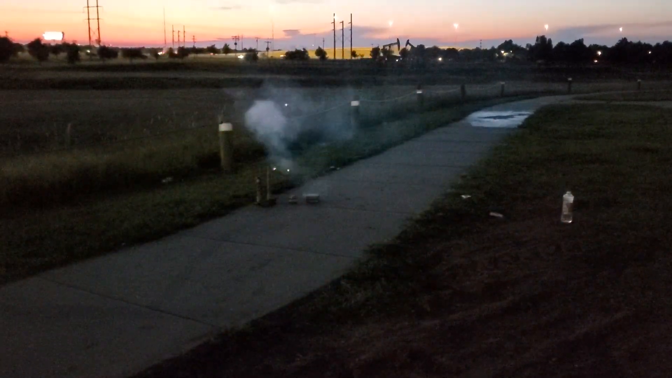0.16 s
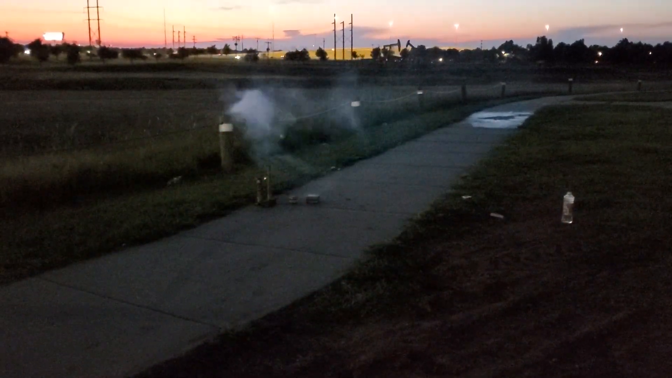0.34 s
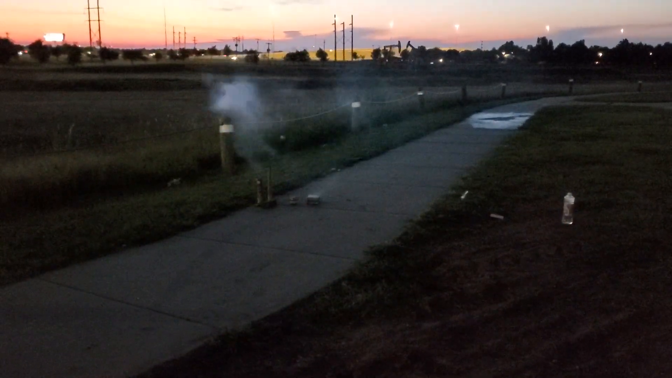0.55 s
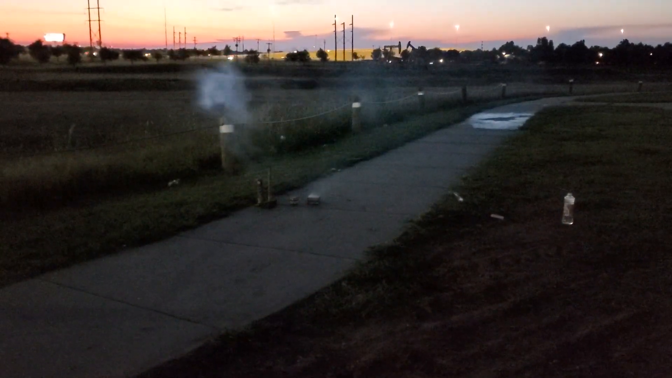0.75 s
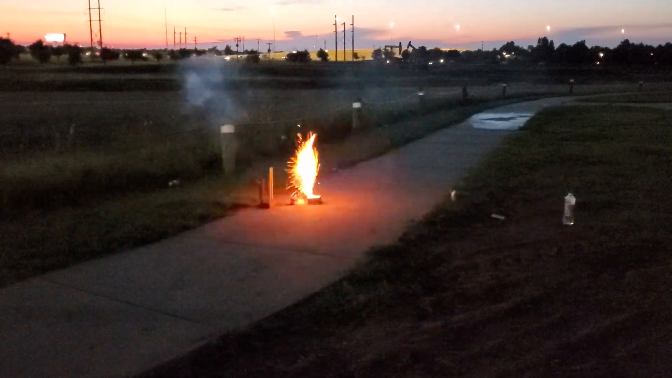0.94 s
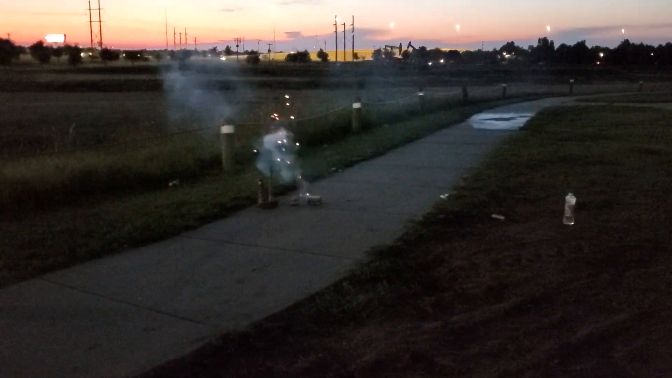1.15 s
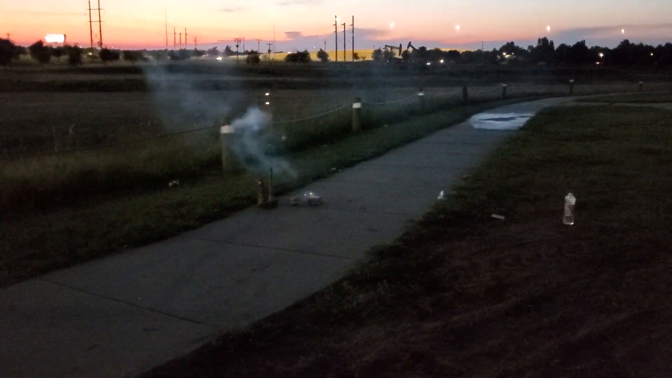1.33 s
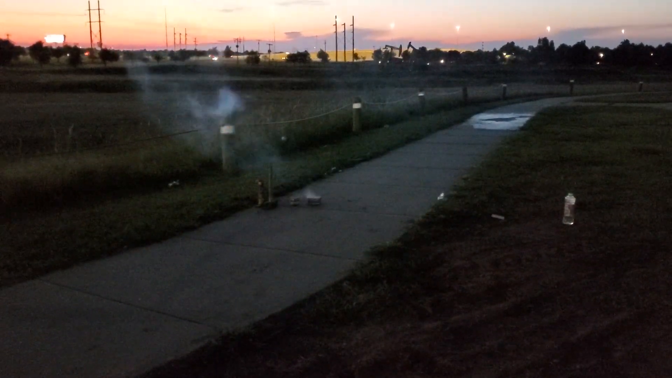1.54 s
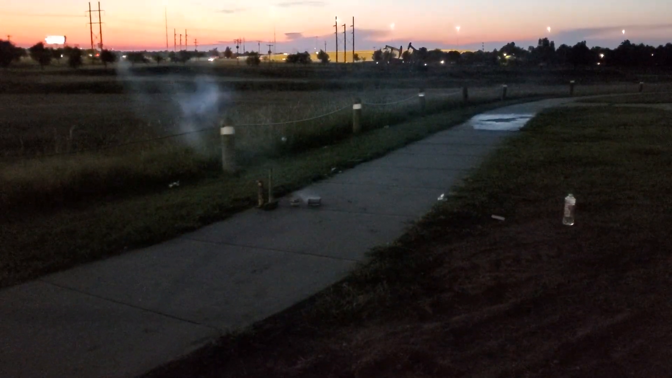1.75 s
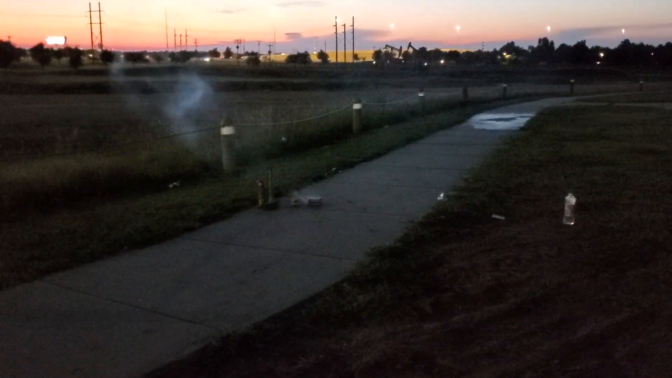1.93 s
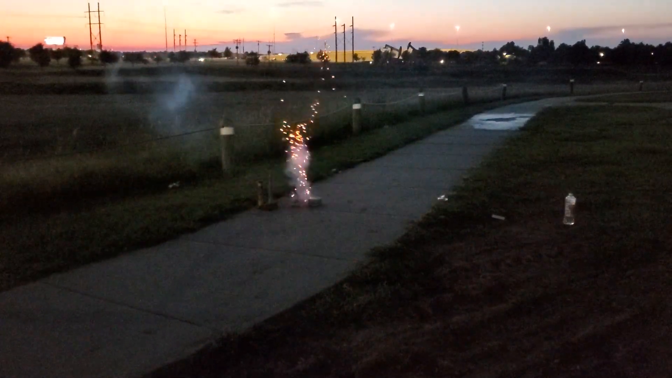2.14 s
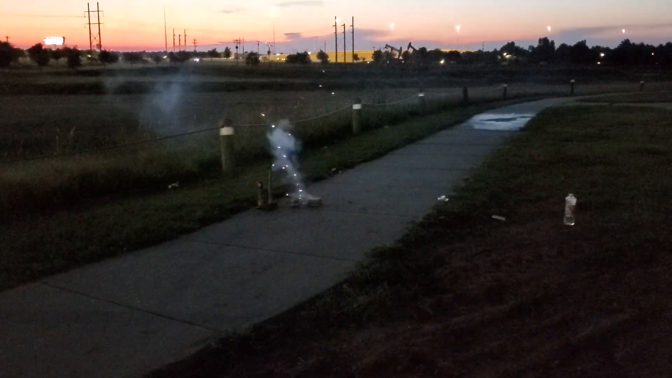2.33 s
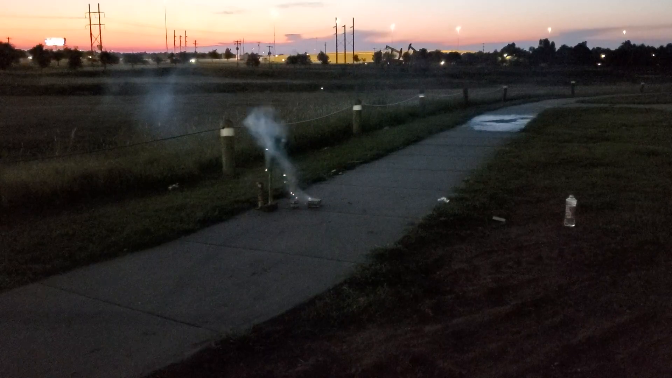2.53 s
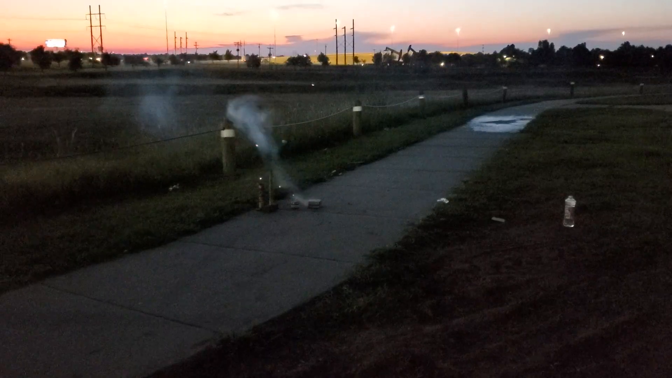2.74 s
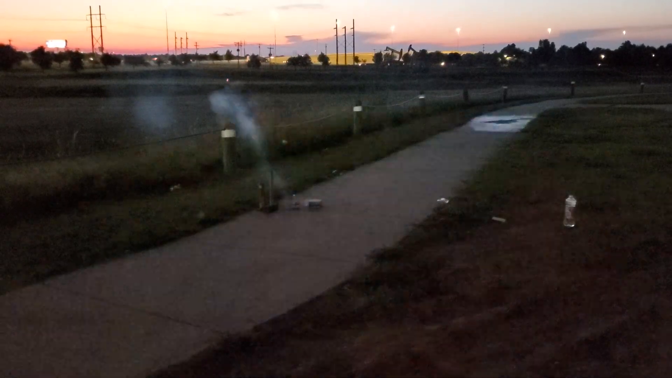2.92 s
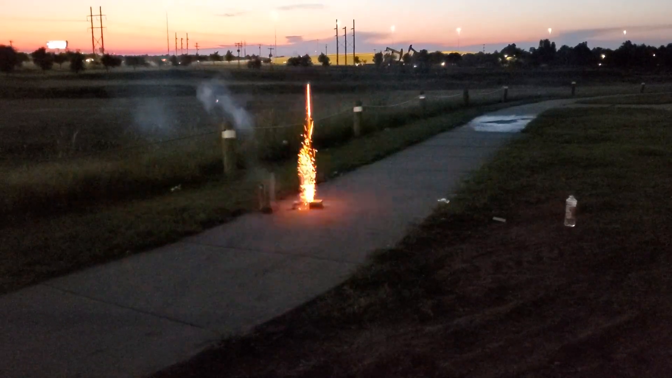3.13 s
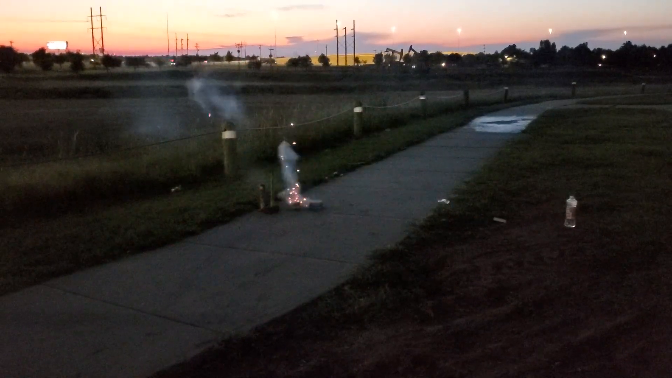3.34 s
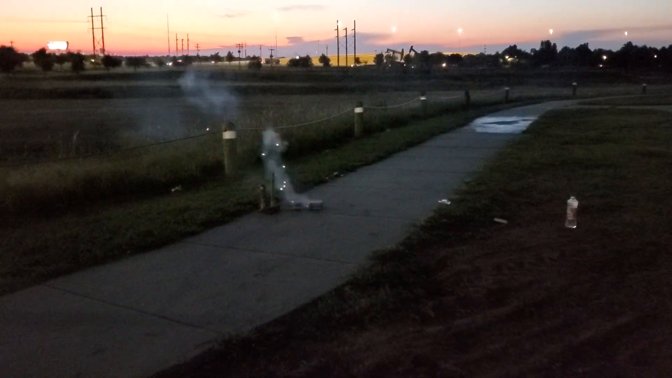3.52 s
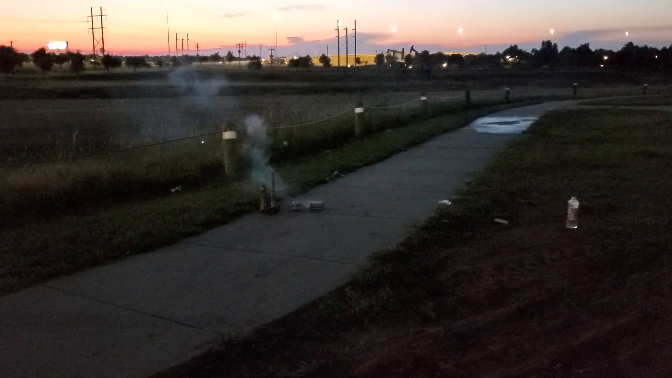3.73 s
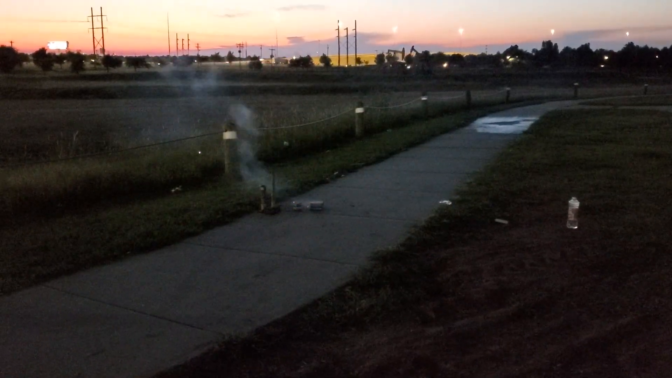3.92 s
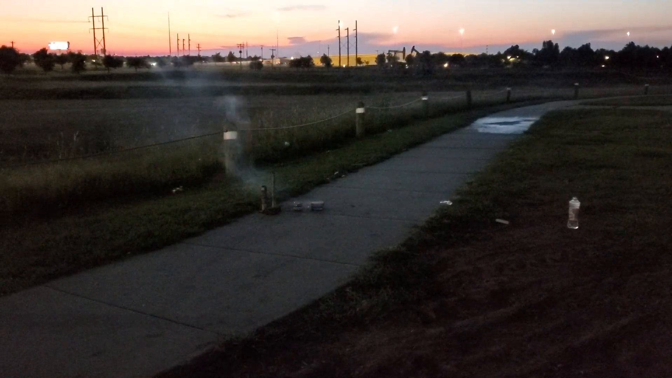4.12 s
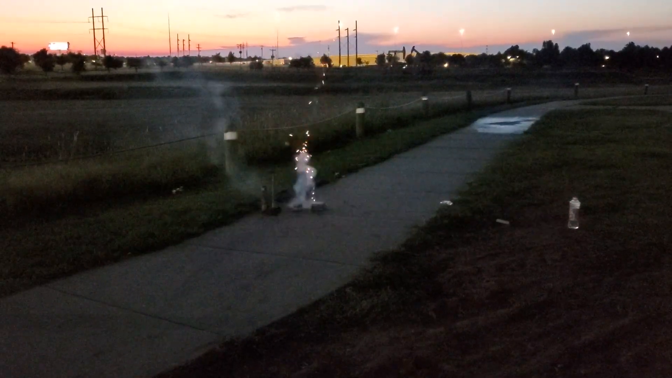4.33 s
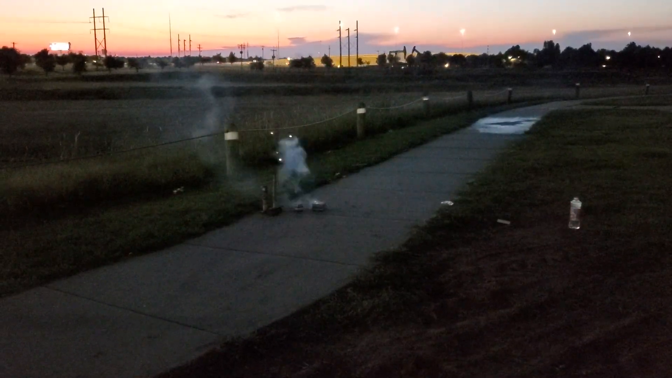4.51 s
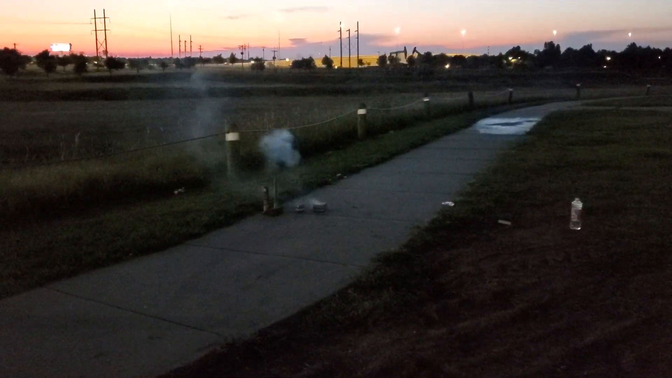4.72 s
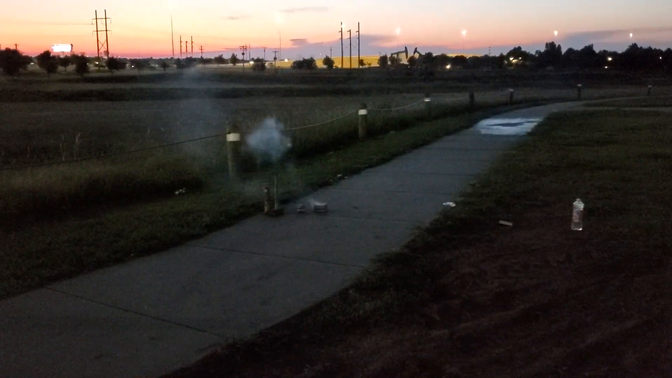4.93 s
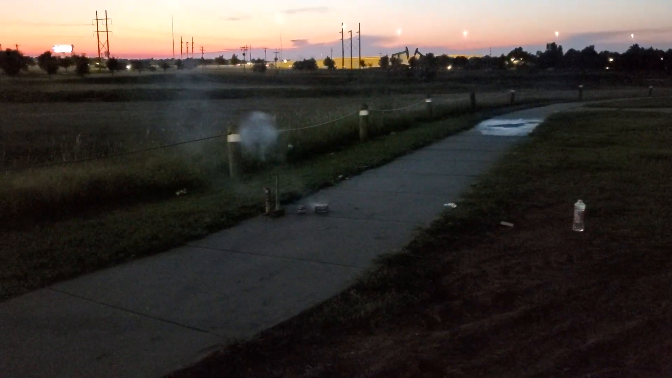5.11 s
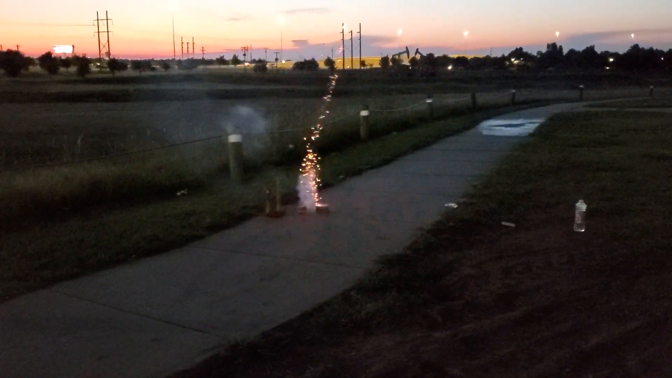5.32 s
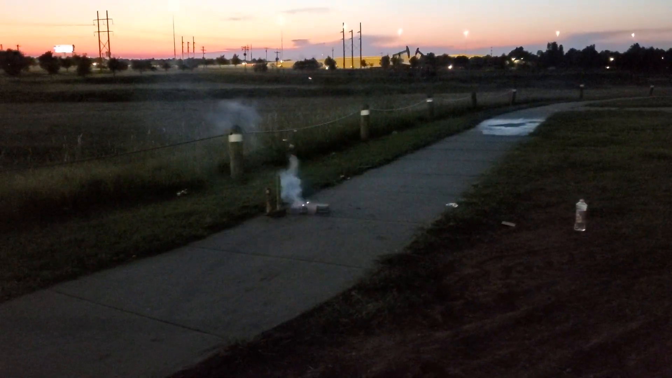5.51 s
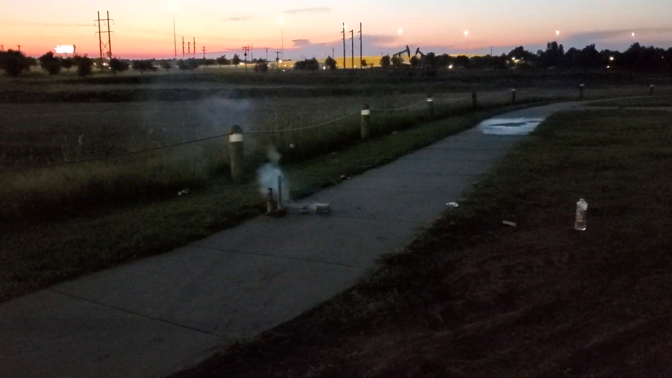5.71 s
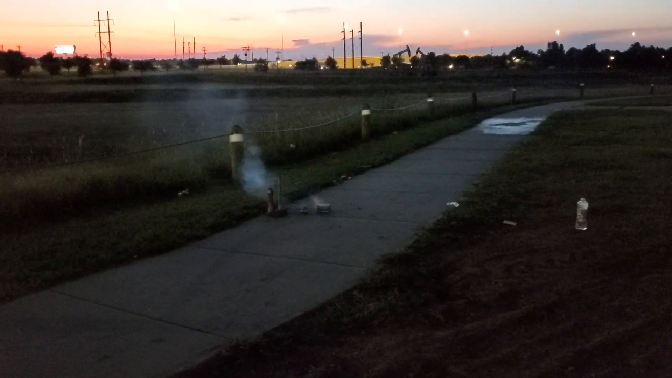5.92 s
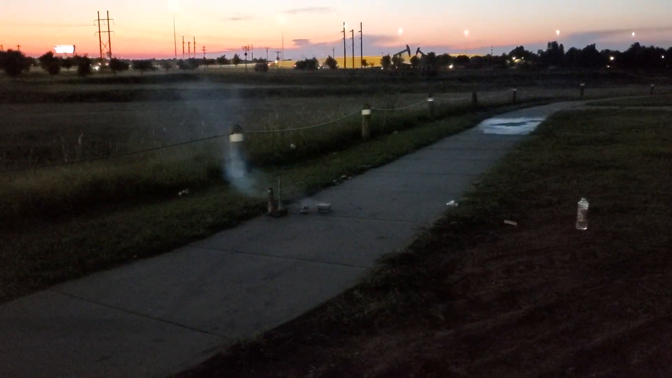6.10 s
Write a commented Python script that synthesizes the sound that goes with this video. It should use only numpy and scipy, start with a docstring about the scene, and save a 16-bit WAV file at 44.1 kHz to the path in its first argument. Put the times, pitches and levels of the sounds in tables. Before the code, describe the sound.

It opens at the tail of one whistle and a sharp crack. Five more small rockets follow at roughly one-second intervals, each with a cardboard pop, hissing shriek falling in pitch and, before the next launch, a loud crack with crackling scatter; the last bursts near the end. Deep thuds rumble between them. Outdoors on grass and concrete, close stereo phone microphone, faint field echo, quiet wind.

```python
"""Rocket battery in an open field

A small battery a few metres from a phone fires about once a second. Each rocket pops out of its tube
(damped modes and gas noise) and climbs with a falling whistle (uneven puffs: tone, overtones, hissing jet)
that beats against its ground reflection. Bursts crack overhead (pulse and decaying noise); short snaps and
knocks are decaying noise. Low thuds, mostly of far-off shells, are blunt pulses with a rumble; the field
echoes faintly (noise convolution), over a low, breezy background."""
import sys
import numpy as np
from scipy import signal
from scipy.fft import rfft, irfft
from scipy.io import wavfile
from scipy.ndimage import uniform_filter1d, map_coordinates

SR = 44100
rng = np.random.default_rng(int(sys.argv[2]) if len(sys.argv) > 2 else 0)


def to_wav(s):
    """Save 16-bit WAV."""
    ch = np.atleast_2d(s).T  # columns
    pcm = np.round(np.clip(ch, -1, 1) * 32767)  # PCM
    wavfile.write(sys.argv[1], SR, pcm.astype(np.int16))


N = 271656

# Rockets: [start t/s, burn time t/s, tube pop peak level/dB, squeal rise above pitch f/Hz, squeal length t/s,
# squeal boost level/dB, early dip of pitch f/Hz, pitch f/Hz, sag/(Hz/s), tone level/dB, level hold t/s,
# fade/(dB/s), rasp level relative to tone/dB, rasp drift/(dB/s)]
ROCKETS = [(-.15, 0.36, -11, 413.5, .015, 14, 1, 3100, 1358, -22, 0.25, 168, -2, -31),
           (1.001, .37, -12, 526, .017, 6, 201.5, 3000, 1493, -14.5, 0.17, 93, -7, -27),
           (2.093, 0.25, -18.5, 169, 0.01625, -8, -110, 2792, 400, -14.5, 0.1, 189, -4.5, -66),
           (3.164, 0.423, -11.5, 270, 0.011, 12.5, 2.5, 2956, 1733, -16, 0.15, 120, -6.5, -37),
           (4.241, 0.48, -8.5, 504, .015, 10.5, 230.5, 3004, 2036, -14.5, 0.16, 92, -9, -3.5),
           (5.3, 0.4, -10, 560, .016, 10, 0, 2935, 1750, -15, 0.16, 97, -6.5, -12)]
# Jumps of the whistle to a new pitch, which then sags: [t/s, pitch f/Hz, sag/(Hz/s), rasp surge level/dB]
JUMPS = [(1.189, 3128, 12540, 9.5), (1.23, 2990, 2664, 5), (2.214, 3000, 1710, 0), (3.343, 3026, 1983, 7),
         (4.531, 2832, 854, 1), (5.574, 2876, 740, -1.5)]
# Overtones; half multiples come from alternating strong and weak puffs: [multiple of pitch, relative level/dB]
OVERTONES = [(1.5, -8.5), (2, 5), (2.5, -21), (3, 4), (3.5, -12.5), (4, 4), (4.5, -20), (5, 10.5)]
# Spectrum of the jet hiss: [f/Hz, relative level/dB]
JET_SPECTRUM = [(400, -54), (2400, 5), (3700, -10), (5200, -8), (7200, 16.5), (9500, -1), (12000, 7),
                (16000, 0.5)]
# Bursts overhead: [t/s, level/dB, lag of ground reflection t/ms, relative level of reflection/dB]
BURSTS = [(.0301, 1, 8.1, -7.5), (0.93, 5.5, 8.4, -8), (2.0832, 2.5, 9.2, -6.5), (3.0612, 7, 7.8, -2),
          (4.4344, 6.5, 9.1, -6), (5.4831, 3.5, 8.1, -0.5)]
# Spectrum of the burst crack: [f/Hz, relative level/dB]
CRACK_SPECTRUM = [(100, -12.5), (400, -8), (800, -8), (1300, -2.5), (2400, -2.5), (3100, -6.5), (3900, -7),
                  (5000, -19), (8500, -22.5), (11500, -48.5), (15000, -12.5)]
# Modes of the cardboard tube: [f/Hz, relative level/dB, 60 dB decay t/s]
TUBE_MODES = [(518, -25.5, 0.11), (1180, 11.5, 0.017), (1900, 5.5, 0.02), (3180, 7, 0.011)]
# Short snaps and knocks: sparks, a tube knock (2.115), a fizz before a burst (3.05): [t/s, peak level/dB]
SNAPS = [(.214, -29), (2.072, -8), (2.115, -8), (2.299, -16.5), (3.05, -16), (3.094, -8.5), (3.312, -16.5),
         (4.715, -24.5), (5.585, -17)]
# Spectrum of snaps, gas and burst scatter: [f/Hz, relative level/dB]
SNAP_SPECTRUM = [(200, 1), (900, -3.5), (2300, 8.5), (4000, -2), (7500, -2.5), (11000, -22.5),
                 (16000, -1.5)]
# The two microphone ports, heard from the battery: [f/Hz, left minus right level/dB, phase lead of left/rad]
PORTS = [(96.4, -12, 0.77), (1125, 4, 1.01), (3290, -5.5, 0.96), (4400, -7.5, 4.13), (6260, 0.5, 8.9),
         (8600, 5.5, 11.2), (12320, 5.5, 11.5), (14300, 5.5, 21.8)]
# Spectrum of the echo from grass and tree lines: [f/Hz, relative level/dB]
FIELD_SPECTRUM = [(400, 4), (1000, -7), (3000, -7), (6000, -6.5), (9000, -14.5), (12000, -38.5),
                  (16000, -58)]
# Low thuds: far-off shells, the rumbling echo of a near burst (4.441), a spent casing landing (5.801, 5.827):
# [t/s, level/dB, upper edge of spectrum f/Hz]
THUDS = [(0.173, -24.5, 140), (0.917, -15, 164), (1.2926, 3.5, 670), (1.508, 2, 440), (1.622, -22, 288),
         (2.1764, -1.5, 302), (2.288, -12, 277), (4.441, -7.5, 404), (4.787, -24.5, 169), (5.801, -25, 465),
         (5.827, -21, 470), (5.899, -26.5, 145)]
# Spectrum of the rolling rumble: [f/Hz, relative level/dB]
RUMBLE_SPECTRUM = [(40, -30), (90, 7.5), (250, 4), (450, -5.5), (800, -14.5), (2000, -13.5), (6000, -30),
                   (10000, -63.5)]
# Spectrum of distant town and light wind: [f/Hz, relative level/dB]
TOWN_SPECTRUM = [(15, -50.5), (25, -13), (64, 8), (242, -17.5), (363, -20.5), (405, -22), (818, -19.5),
                 (1480, -26), (1890, -23.5), (2840, -23.5), (5880, -47.5), (16000, -55)]
# Breeze on the microphone, a gain on the deepest background: [t/s, level/dB]
BREEZE = [(0, 0), (2.5, 3.5), (3.2, -8.5), (5.2, -3), (6.1, -7.5)]

T = np.arange(N) / SR  # time/s
POP_LEAD_S = 0.011  # the tube pops this long before the whistle starts
STEADY_S, KNEE_S = 0.074, 0.014  # the pitch holds, then bends into its sag as the fuel burns down
DIP_S = .03  # decay constant of the pitch dip
# pause before the new sag, decay constant of the rasp surge, time a jump takes
JUMP_STEADY_S, SURGE_S, GLIDE_S = 0.0081, .045, 0.0023
SLIP_RAD = .5  # spread of the slip between strong and weak puffs
# sparks thrown by a burst: least delay, mean gap, level relative to the burst, fall with delay
EMBER_DELAY_S, EMBER_GAP_S, EMBER_DB, EMBER_DB_PER_S = .02, .025, -22.5, -63
TOWN_DB = -40  # rms level of the part common to both channels, before the breeze
TOP_HZ = 16000  # upper limit of the phone


def undb(db):
    """Logarithmic law: amplitude gain from decibels."""
    return 10 ** (np.asarray(db) / 20)


def unit(x):
    """Power normalisation: scale to rms 1."""
    return x / np.sqrt(np.mean(x ** 2))


def peak(x, db):
    """Amplitude normalisation: scale to a peak level."""
    return x * undb(db) / np.abs(x).max()


def fade(t, t60):
    """Exponential damping: 60 dB of decay in t60."""
    return np.exp(-np.log(1000) * t / t60)


def along(points, size):
    """Log-frequency interpolation: columns beside the first, f/Hz, at the bins of a transform of this size."""
    hz, *columns = np.transpose(points)
    bins = np.log(np.maximum(np.fft.rfftfreq(size, 1 / SR), 1))
    return [np.interp(bins, np.log(hz), column) for column in columns]


def noise(points, size):
    """Spectral shaping: white noise weighted by a spectrum, at rms 1."""
    gain = undb(along(points, size)[0])
    return unit(irfft(rfft(rng.standard_normal(size)) * gain, size))


def wide(points, size, side):
    """Sum and difference stereo: independent shaped noises, the difference scaled by side."""
    return noise(points, size) + side * np.array([[1], [-1]]) * noise(points, size)


def impulse(points, size=1024):
    """Minimum phase: a folded cepstrum gives the most compact causal pulse with this spectrum."""
    cepstrum = irfft(np.log(undb(along(points, size)[0])))
    cepstrum[1:size // 2] *= 2
    cepstrum[size // 2 + 1:] = 0
    return irfft(np.exp(rfft(cepstrum)))


def walk(rate, size):
    """Random modulation: a smooth curve through normal values of spread 1, rate of them a second."""
    steps = np.arange(size) * rate / SR
    return map_coordinates(rng.standard_normal(size), [steps], order=2, mode="nearest")


def add(track, s, x):
    """Superposition: mix x into the track from time s, dropping what lies outside."""
    start = int(s * SR)
    x = x[..., max(-start, 0):max(N - start, 0)]
    start = max(start, 0)
    track[..., start:start + x.shape[-1]] += x


def whistles(delay_s=0):
    """Superposition of sources: all the rockets in turn."""
    out = np.zeros((2, N))
    for start, burn_s, _, *voice in ROCKETS:
        whistle = rocket(*flight(start, burn_s, *voice))
        add(out, start + delay_s, climb(whistle))
    return out


def flight(start, burn_s, squeal_hz, squeal_s, squeal_db, dip_hz, hz, sag, db, hold_s, fade_db_per_s,
           rasp_db, drift_db_per_s, burnout_s=.04):
    """Burning and receding source: age, pitch, level and rasp from ignition squeal through sag to burn-out."""
    age = T[:SR // 2]
    pitch_hz = sagging(age, hz, sag, STEADY_S) - dip_hz * np.exp(-age / DIP_S)
    rasp = rasp_db + drift_db_per_s * age
    for s, jump_hz, jump_sag, surge_db in JUMPS:
        if 0 < s - start < age[-1]:
            since = np.maximum(age - (s - start), 0)
            pitch_hz = np.where(since > 0, sagging(since, jump_hz, jump_sag, JUMP_STEADY_S), pitch_hz)
            rasp = rasp + (since > 0) * surge_db * np.exp(-since / SURGE_S)
    squeal = np.exp(-(age / squeal_s) ** 4)
    pitch_hz = uniform_filter1d(pitch_hz, int(GLIDE_S * SR)) + squeal_hz * squeal
    # the boost is greatest shortly before the squeal breaks
    boost_db = squeal_db * np.exp(-((age / squeal_s - .68) / 0.32) ** 2)
    spent_db = 20 * np.maximum(age - burn_s + burnout_s, 0) / burnout_s  # 20 dB down at the burn time
    distance_db = fade_db_per_s * np.maximum(age - hold_s, 0)
    level_db = db + boost_db - distance_db - spent_db
    return age, pitch_hz, level_db, rasp - boost_db  # so the boost acts on the tone alone


def sagging(age, hz, hz_per_s, steady_s):
    """Pitch glide: a brief hold that bends smoothly into a steady fall."""
    return hz - hz_per_s * KNEE_S * np.logaddexp(0, (age - steady_s) / KNEE_S)


def wildness(pitch_hz, age, settle=0.02):
    """Unstable combustion: the flame is wild after ignition and at fast pitch changes; 0 settled, 2 at most."""
    slew = np.abs(np.gradient(pitch_hz)) * SR  # Hz/s
    return np.exp(-age / settle) + np.clip(uniform_filter1d(slew, size=700) / 25000, 0, 1)


def rocket(age, pitch_hz, level_db, rasp_db, attack_s=0.0042, jitter=0.0067, wild=2.8, flutter_rad=0.068,
           jet_db=-5.0, sputter_db=2.5, air_hz=9190.0, air_db_per_s=-32):
    """Pulsed burning: steep, uneven puffs ring the rocket's tube, and the jet hisses with each."""
    size = len(age)
    unrest = 1 + wild * wildness(pitch_hz, age)
    phase = 2 * np.pi * np.cumsum(pitch_hz * (1 + jitter * unrest * walk(350, size))) / SR
    ragged = phase + flutter_rad * walk(1300, size)
    slip = SLIP_RAD * walk(900, size)  # the strong-weak pattern keeps slipping, which blurs the half multiples
    overtones = np.zeros(size)
    for k, db in OVERTONES:
        half = 2 * k % 2  # 1 for a half multiple, else 0
        overtones += undb(db + sputter_db * walk(300, size)) * np.sin(k * ragged + half * slip)
    puffing = 1 + 0.055 * np.cos(phase)
    jet = unit(noise(JET_SPECTRUM, size) * puffing * undb(2.2 * walk(414, size)))
    rasp = undb(rasp_db) * (unit(overtones) + undb(jet_db) * jet)
    # the top of the rasp thins out as the rocket draws away
    dull = signal.sosfiltfilt(signal.butter(2, air_hz, fs=SR, output="sos"), rasp)
    rasp = dull + (rasp - dull) * undb(air_db_per_s * age)
    gate = np.clip(age / attack_s, 0, 1) * np.clip((age[-1] - age) / .015, 0, 1)
    return gate * undb(level_db) * (unit(np.sin(phase)) + rasp)


def ground_lag(age, speed=13., thrust=90.1, distance=5.4, mic_height=1.2):
    """Image source: delay/s of the ground reflection; speed/(m/s), thrust/(m/s^2), distance/m, mic_height/m."""
    height = speed * age + thrust * age ** 2 / 2
    extra = np.hypot(distance, height + mic_height) - np.hypot(distance, height - mic_height)
    return extra / 343  # speed of sound, m/s


def climb(x, ground=0.46, lift_off=0.0028, veer_ms=0.008, waver_db=1.0):
    """Interference: direct sound and a ground reflection of growing lag make the whistle throb at each port."""
    age = np.arange(len(x)) / SR
    bounce = ground * (1 - np.exp(-age / lift_off))
    pair = []
    for _ in range(2):
        # the rocket veers, so the path to each port wanders a little
        heard = age + veer_ms / 1000 * walk(27.5, len(x))
        direct = map_coordinates(x, [heard * SR])
        reflection = map_coordinates(x, [(heard - ground_lag(age)) * SR])
        pair.append((direct + bounce * reflection) * undb(waver_db * walk(89.8, len(x))))
    return np.array(pair)


def bursts(front_db=1, shred_db=-15, shred_t60=0.004, scatter_db=-29, scatter_t60=0.26, crackle_db=4):
    """Shock radiation: a front and tearing casing, again off the ground, with crackle and scatter from grass."""
    out, t = np.zeros(N), T[:SR // 3]
    for s, db, lag_ms, ground_db in BURSTS:
        crack = undb(shred_db) * noise(CRACK_SPECTRUM, len(t)) * fade(t, shred_t60)
        front = peak(impulse(CRACK_SPECTRUM), front_db)
        crack[:len(front)] += front
        crackle = unit(noise(SNAP_SPECTRUM, len(t)) * undb(crackle_db * walk(677, len(t))))
        scatter = crackle * fade(t, scatter_t60)
        add(out, s, undb(db) * (crack + undb(scatter_db) * scatter))
        add(out, s + lag_ms / 1000, undb(db + ground_db) * crack)
    return out


def launches(gas_db=-7, gas_t60=0.14):
    """Modal ringing: ignition knocks the cardboard tube and lets out a spit of gas."""
    out, t = np.zeros(N), T[:SR // 8]
    for start, _, db, *_ in ROCKETS:
        ring = sum(undb(mode_db) * np.sin(2 * np.pi * hz * t) * fade(t, t60) for hz, mode_db, t60 in TUBE_MODES)
        gas = undb(gas_db) * noise(SNAP_SPECTRUM, len(t)) * fade(t, gas_t60)
        add(out, start - POP_LEAD_S, peak(ring + gas, db))
    return out


def snaps(snap_t60=0.013, fizz_db=-14, fizz_t60=0.18):
    """Two-rate decay: sparks and other short knocks as noise that snaps and then fizzes out."""
    out, t = np.zeros(N), T[:SR // 10]
    for s, db in SNAPS + embers():
        envelope = fade(t, snap_t60) + undb(fizz_db) * fade(t, fizz_t60)
        add(out, s, peak(noise(SNAP_SPECTRUM, len(t)) * envelope, db))
    return out


def embers(count=3):
    """Random arrivals: sparks thrown by each burst, weaker the later they snap; rows of t/s, peak level/dB."""
    rows = []
    for s, db, *_ in BURSTS:
        for late in EMBER_DELAY_S + EMBER_GAP_S * np.cumsum(2 * rng.random(count)):
            rows.append((s + late, db + EMBER_DB + EMBER_DB_PER_S * late))
    return rows


def ports(pair):
    """Diffraction: the phone's body shades and delays the two ports differently."""
    balance_db, lead = along(PORTS, N)
    response = np.array([undb(balance_db / 2), undb(-balance_db / 2) * np.exp(-1j * lead)])
    return irfft(rfft(pair) * response, N)


def nearby(pair, scatter_db=-4.0, t60=0.026):
    """Short-range scattering: rough ground and the hand round the phone reach each port differently."""
    t = T[:SR // 20]
    colour = [(1000, 5.5), (3000, -21), (7000, 6.5)]  # f/Hz, relative level/dB
    paths = np.array([noise(colour, len(t)) * fade(t, t60) for _ in range(2)])
    paths *= undb(scatter_db) / np.sqrt(np.sum(paths ** 2) / 2)
    return pair + signal.fftconvolve(pair, paths, axes=1)[:, :N]


def field(x, echo_db=-23, t60=0.96, rise=0.19, trees_db=-31):
    """Diffuse reflection: weak, blurred echoes from grass and posts, and one faint return from the tree line."""
    t = T[:2 * SR]
    shape = (1 - np.exp(-t / rise)) * fade(t, t60)
    echoes = np.array([noise(FIELD_SPECTRUM, len(t)) * shape for _ in range(2)])
    echoes *= undb(echo_db) / np.sqrt(np.sum(echoes ** 2) / 2)
    trees_s = .41  # delay of the return
    add(echoes, trees_s, undb(trees_db) * impulse(FIELD_SPECTRUM))
    return signal.fftconvolve(x, echoes, axes=1)[:, :N]


def first_echo(db=4):
    """Reverberant persistence: the field still rings with the first rocket, begun just before the scene opens."""
    out, lead_s = np.zeros((2, N)), -ROCKETS[0][0]
    before = whistles(lead_s) * (T < lead_s)
    add(out, -lead_s, undb(db) * field(before))
    return out


def thuds(low_ratio=0.19, edge_db=-18, rumble_db=-32, rumble_growth=0.65, rumble_t60=1.73, rumble_rise=0.093,
          roll_db=4.0, pan_db=-5, lag_ms=0.75):
    """Low-passed pressure pulse: each thud is one blunt wave, then a rolling rumble from all round."""
    out, t = np.zeros((2, N)), T[:SR]
    for s, db, top_hz in THUDS:
        low_hz = low_ratio * top_hz
        colour = [(low_hz / 4, -20), (low_hz, 0), (top_hz, 0),
                  (3 * top_hz, edge_db), (8 * top_hz, -44), (20 * top_hz, -75)]
        thud = peak(impulse(colour, size=4096), db)
        # the thud is later and weaker on the left
        add(out[0], s + lag_ms / 1000, undb(pan_db / 2) * thud)
        add(out[1], s, undb(-pan_db / 2) * thud)
        roll = (1 - np.exp(-t / rumble_rise)) * fade(t, rumble_t60) * undb(roll_db * walk(43.45, len(t)))
        rumble = roll * wide(RUMBLE_SPECTRUM, len(t), side=1.0)
        add(out, s, undb(rumble_growth * db + rumble_db) * rumble)
    return out


def town(side=1.0, swell_db=5.0, breeze_hz=102.0):
    """Stationary noise: a steady, low background whose deepest part swells with the breeze."""
    air = undb(TOWN_DB) * wide(TOWN_SPECTRUM, N, side)
    low = signal.sosfiltfilt(signal.butter(2, breeze_hz, fs=SR, output="sos"), air)
    breeze_db = np.interp(T, *np.transpose(BREEZE)) + swell_db * walk(4.18, N)
    return air - low + low * undb(breeze_db)


def scene():
    """Superposition: the battery and snaps close by, their echo, the low thuds and the town."""
    battery = whistles() + bursts() + launches() + snaps()
    return nearby(ports(battery)) + field(battery) + first_echo() + thuds() + town()


def record(dry):
    """Saturation and band limiting: the phone rounds off the loudest peaks and cuts the top."""
    rounded = dry / (1 + dry ** 6) ** (1 / 6)
    return signal.sosfilt(signal.ellip(8, .2, 70, TOP_HZ, fs=SR, output="sos"), rounded)


dry = scene()
out = record(dry)
to_wav(out)
```